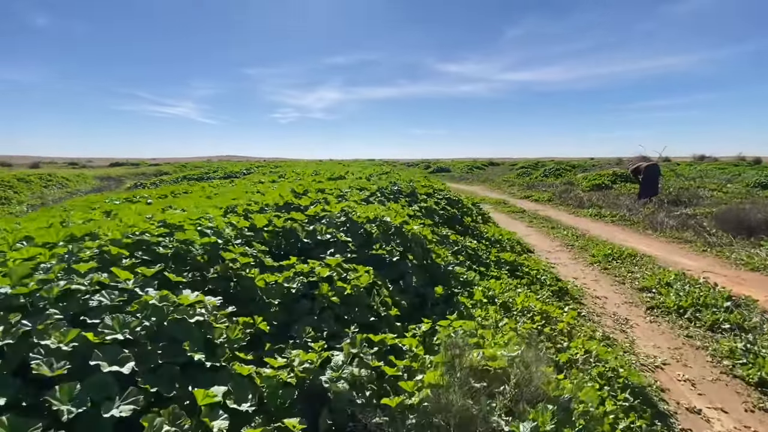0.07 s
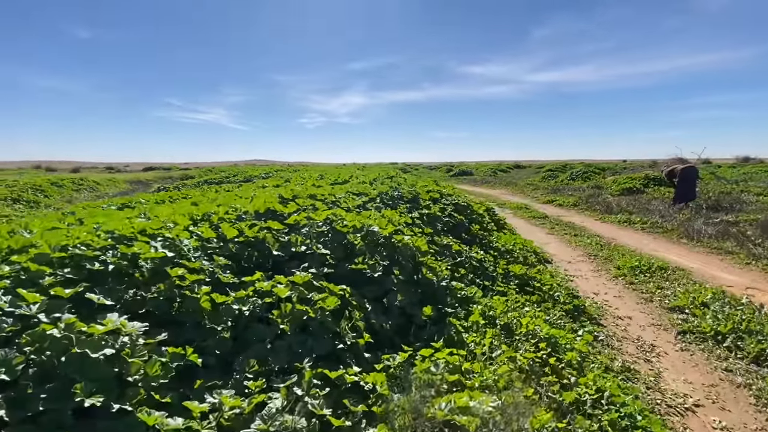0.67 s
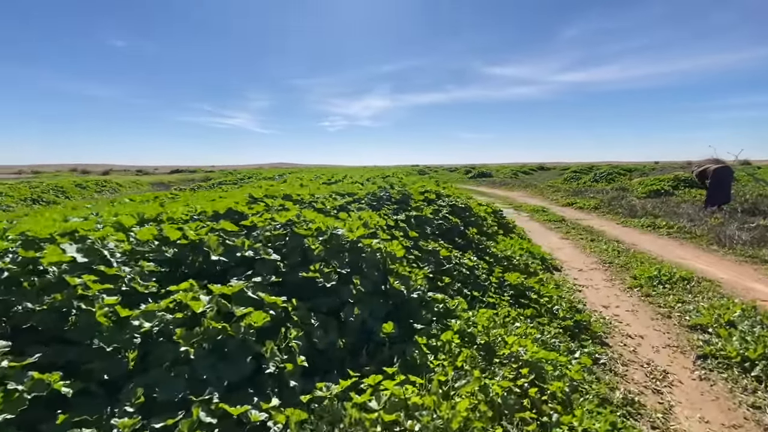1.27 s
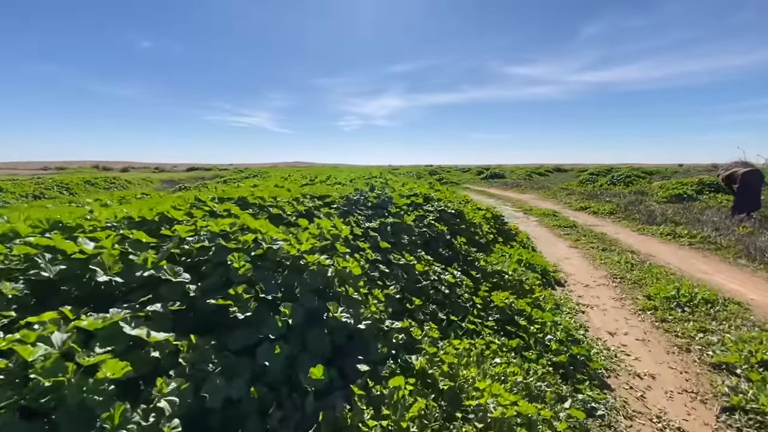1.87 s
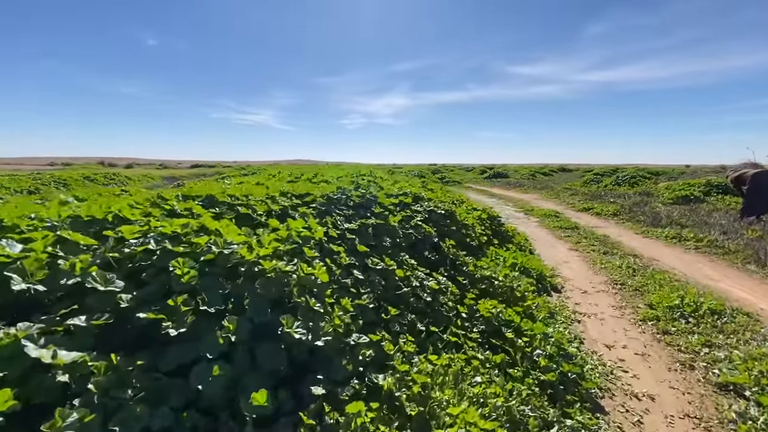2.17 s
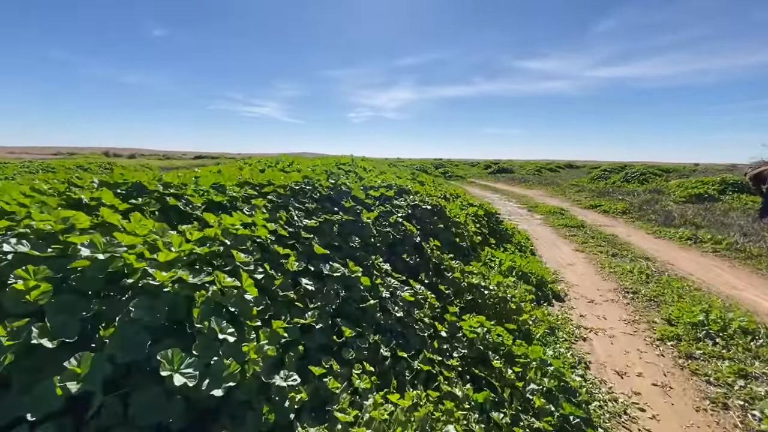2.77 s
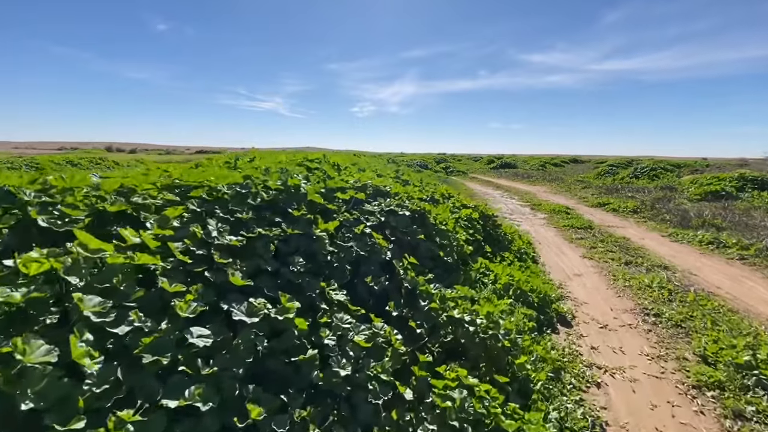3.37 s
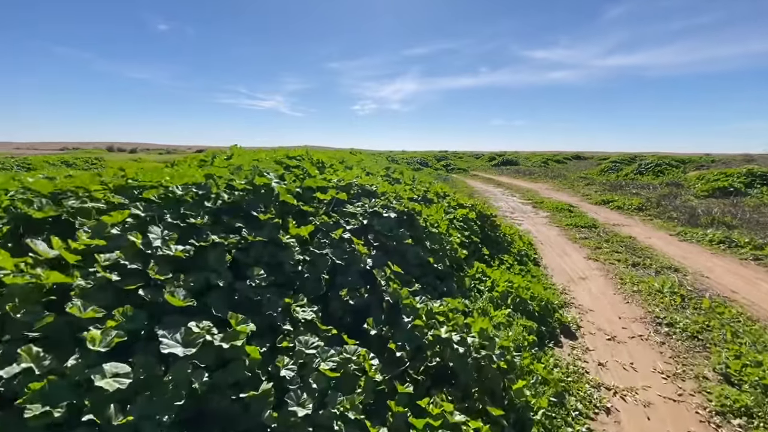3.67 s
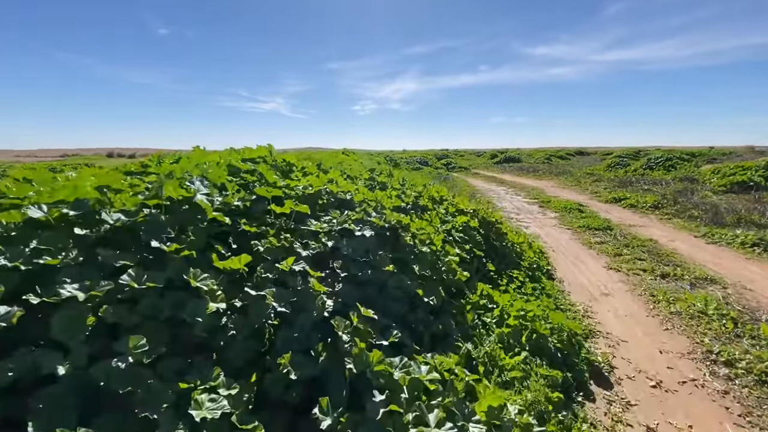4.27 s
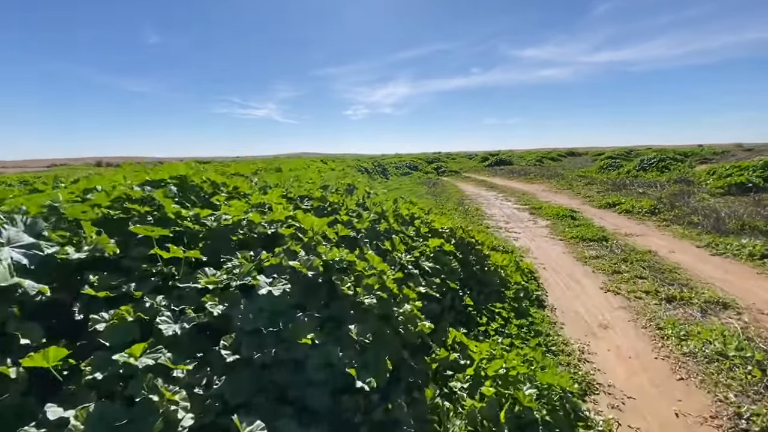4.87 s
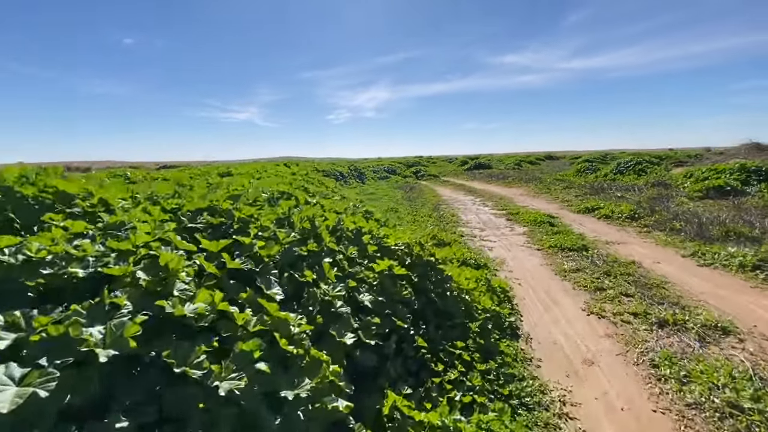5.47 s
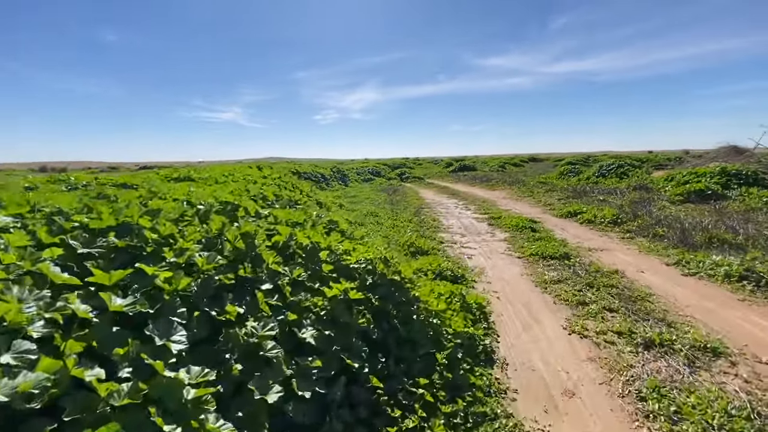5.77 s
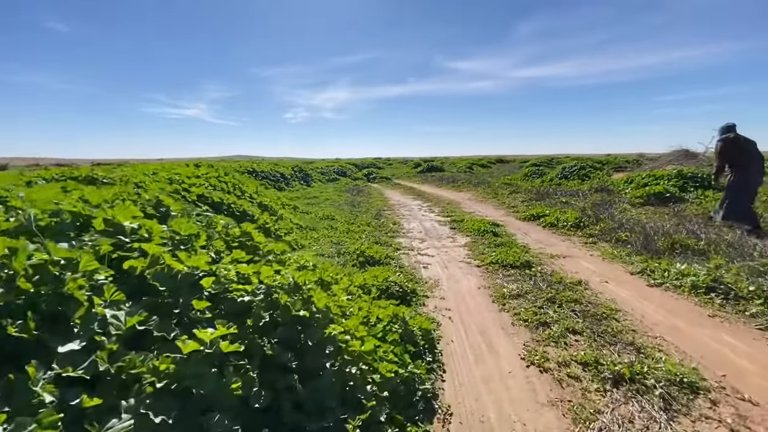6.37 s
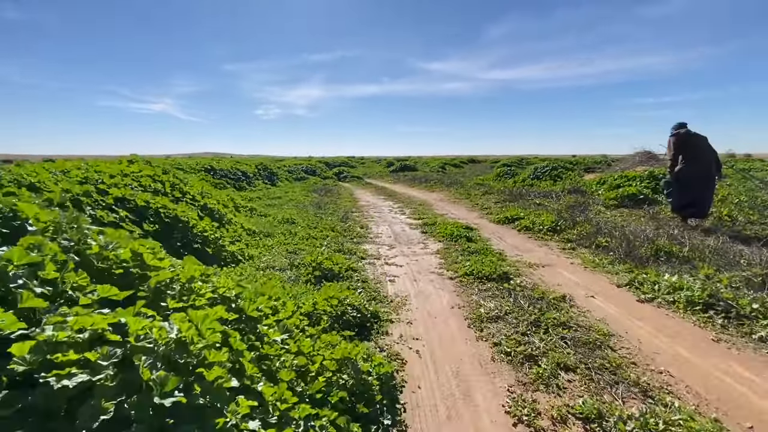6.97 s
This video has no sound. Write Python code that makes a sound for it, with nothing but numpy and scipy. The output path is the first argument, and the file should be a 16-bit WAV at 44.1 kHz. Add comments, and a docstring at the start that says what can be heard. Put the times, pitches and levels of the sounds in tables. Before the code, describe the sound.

Slow, soft footsteps grind sand and brush low leaves, while wind rumbles on the microphone and a small bird warbles faintly.

```python
"""Open country, the edge of a sandy track; slow, soft steps close under a hand-held microphone.
From the start soles grind sand and knock on clods, low leaves brush the legs, stalks snap and a small
bird warbles some way off to the left. At 1 s a broad leaf drags along a trouser leg and slips free;
the breeze then freshens and buffets the microphone until about 3 s. Near 5 s the bird sings again,
the shoes go on into dry, crackling straw, and at 7 s the breeze drops."""
import sys
import numpy as np
from scipy import signal
from scipy.io import wavfile
from scipy.ndimage import uniform_filter1d

SR = 44100
rng = np.random.default_rng(int(sys.argv[2]) if len(sys.argv) > 2 else 0)


def materialize(psi):
    """Save the field psi as 16-bit PCM at rate SR to the path in sys.argv[1].

    A 1-D psi becomes a single channel; in a 2-D psi each row is a channel.
    """
    bounded = np.clip(np.atleast_2d(psi).T, -1, 1)
    quanta = np.round(bounded * 32767).astype(np.int16)
    wavfile.write(sys.argv[1], SR, quanta)


N = 309141
TIME = np.arange(N) / SR

# Table levels are relative: each source adds its own gain on the way to the microphone.
# footfalls, about 0.65 s apart: (time of full weight [s], swell [s], fade [s], sand [dB], leaves [dB])
FOOTFALLS = [(0.099, 0.93, 1, -58, -53.5), (0.838, 0.033, 0.11, -56.5, -49.5),
             (1.485, 0.1, 0.36, -62.5, -64), (2.121, 0.17, 0.21, -56, -54),
             (2.779, 0.0082, 0.11, -50, -55.5), (3.42, 0.1, 0.21, -57, -61),
             (3.984, 0.086, 0.18, -51, -53.5), (4.781, 0.22, 0.15, -54.5, -52.5),
             (5.386, 0.068, 0.34, -58.5, -60), (6.024, 0.024, 0.2, -55, -53.5),
             (6.717, 0.028, 0.25, -57, -59.5)]
# the other foot pushes off and swings through the plants: (time [s], sand [dB], leaves [dB])
FOOT_SCUFFS = [(0.35, -83, -54), (0.56, -71, -56), (1.021, -49.5, -48.5), (1.19, -63, -65),
               (1.99, -64, -76), (2.462, -65.5, -59), (2.611, -59.5, -65), (2.805, -67, -71),
               (2.91, -63, -64), (3.275, -63, -68), (3.58, -66, -71), (3.888, -59, -74), (4.579, -59, -66),
               (4.715, -53.5, -75), (5.92, -62, -59.5), (6.18, -85, -57.5), (6.39, -71, -53.5),
               (6.579, -57.5, -60.5)]
# the swinging foot is clear of sand and plants: (time [s])
FOOT_CLEAR = [0.68, 1.28, 1.889, 2.74, 3.15, 3.78, 4.36, 4.449, 5.2, 5.84, 6.32, 6.652]
# the shoe meets clods and pebbles: (time [s], level [dB], pitch [Hz])
CLOD_KNOCKS = [(0.873, -35, 690), (1.0, -46, 1410), (1.0191, -38.5, 1270), (2.191, -39, 970),
               (2.309, -46, 1090), (2.9636, -40.5, 1150), (3.2379, -49, 910), (3.243, -44.5, 750),
               (3.276, -40.5, 850), (3.598, -47, 1490), (3.746, -52.5, 1120), (4.253, -51.5, 1190),
               (4.532, -51, 925), (4.574, -46.5, 1300), (4.63, -48.5, 915), (4.798, -41.5, 940),
               (4.906, -51, 1080), (5.298, -46, 1410), (5.579, -43, 840), (6.579, -46, 740),
               (6.912, -46, 660)]
# stalks break underfoot: (time [s], level [dB])
STALK_SNAPS = [(0.1132, -42), (0.2127, -49), (0.317, -51.5), (0.454, -47.5), (0.5252, -46), (0.738, -43.5),
               (0.761, -49.5), (2.1896, -41), (2.2342, -46), (2.308, -51.5), (2.4028, -50), (2.4562, -46),
               (2.467, -52), (3.6, -57), (4.024, -48.5), (4.538, -55), (4.9047, -54.5), (4.9797, -52),
               (5.363, -55), (5.756, -56), (6.346, -55), (6.3708, -47.5), (6.383, -42.5), (6.494, -56.5),
               (6.578, -54)]
# the shoe presses on dry straw: (time [s], level [dB])
STRAW_PRESSES = [(5.78, -70), (6.381, -66.5), (6.73, -79)]
# spectra of sliding sand and of dry stalks: (frequency [Hz], level [dB])
SAND_COLOUR = [(200, -20), (500, -5), (850, 1), (1600, 1.5), (2400, -4), (4000, -8.5), (6000, -31),
               (12000, -56)]
STRAW_COLOUR = [(800, -30), (3000, -45), (4400, -9), (5000, 7), (5350, -10), (5700, 5), (6100, -2),
                (6500, 4), (7800, -5.5), (8200, 2.5), (9700, 0.5), (11400, 3.5), (12800, -13), (15500, -17)]
# leaf spectrum at the microphone's two ports, a list each: (frequency [Hz]), (left [dB]), (right [dB])
LEAF_BANDS_HZ = [800, 2200, 3300, 4900, 5350, 5700, 6150, 6700, 7750, 8150, 9300, 10100, 11600, 13200]
LEAF_LEFT_DB = [-14.5, -2.5, -3, 0, -4.5, -2, -5.5, -1.5, -5, -8, -9, -35, -18.5, -37]
LEAF_RIGHT_DB = [-0.5, -6.5, -5.5, -11, -15, -16, -46, -8, -21.5, -2.5, 0, -5.5, -19, -36]
# the breeze at the microphone freshens, eases and drops: (time [s], rumble [dB], buffeting [dB])
BREEZE_LEVELS = [(0.0, -38, -63), (0.62, -44.5, -64), (1.55, -35.5, -48), (2.1, -40, -50.5),
                 (2.85, -39, -54), (3.35, -44.5, -66), (4.89, -44.5, -62), (5.76, -41, -59.5),
                 (6.75, -50, -67.5), (7.0, -67, -79.5)]
# gusts and lulls on top of it: (time [s], change of rumble [dB])
BREEZE_GUSTS = [(0.5, -4.5), (0.869, 7.5), (1.501, 5), (1.661, -8), (3.42, -6), (3.96, 4), (4.38, -18),
                (4.67, 4), (4.86, -5.5), (6.21, 0.5), (6.45, 4), (6.6, 7.5)]
# single eddies strike the microphone: (time [s], level [dB], pitch [Hz])
EDDY_THUMPS = [(0.565, -48, 237), (1.359, -34.5, 160), (1.456, -50, 463), (1.52, -37.5, 400),
               (1.95, -43, 185), (2.087, -44, 276), (2.153, -46.5, 420), (2.176, -46.5, 500),
               (2.188, -38.5, 345), (2.324, -41, 198), (2.332, -45, 477), (2.58, -44, 450),
               (2.69, -50.5, 450), (2.984, -49, 436), (4.66, -45, 210), (5.784, -43.5, 202),
               (6.31, -49, 230)]
# spectra of the wind on the microphone: (frequency [Hz], level [dB])
RUMBLE_COLOUR = [(30, -27), (48, -3.5), (66, 1), (100, -3), (160, -12), (260, -21.5), (500, -65.5),
                 (1200, -86.5)]
BUFFET_COLOUR = [(50, -15), (130, 0), (220, 2), (350, -5), (550, -16), (900, -31.5), (2500, -89.5)]
# the distant bird's slurs: (time [s], length [s], first pitch [Hz], last pitch [Hz], level [dB])
BIRD_SLURS = [(0.376, 0.094, 4330, 3420, -70), (0.628, 0.087, 3530, 3850, -76),
              (0.87, 0.091, 4350, 3540, -69.5), (1.097, 0.078, 3820, 3390, -69),
              (1.171, 0.16, 4350, 3260, -75.5), (5.038, 0.094, 4080, 3680, -75.5),
              (5.205, 0.12, 3830, 3460, -72), (5.436, 0.13, 3860, 3420, -71),
              (5.691, 0.1, 3140, 2910, -79.5), (6.651, 0.12, 4140, 3690, -69.5),
              (6.817, 0.11, 3850, 4630, -73), (6.925, 0.045, 3190, 3500, -68)]
# its trills: (time [s], length [s], first pitch [Hz], last pitch [Hz], warble rate [1/s], level [dB],
# warble depth [Hz])
BIRD_TRILLS = [(1.311, 0.13, 3810, 2780, 40, -64.5, 220), (1.429, 0.084, 2880, 4280, 67, -54, 445),
               (1.623, 0.095, 3340, 2810, 56, -67.5, 200), (1.712, 0.0833, 3260, 3590, 35, -56, 386),
               (1.884, 0.032, 4150, 4450, 61, -63, 440), (4.965, 0.074, 3400, 3900, 49, -67, 220)]
# spectrum of the open field's hush: (frequency [Hz], level [dB])
AIR_COLOUR = [(300, 6), (600, -4), (3400, -8), (6100, -17), (9200, -10), (13000, -85.5)]


def walk(scuff_swell_s=0.099, scuff_fade_s=0.12, crumble_db=-15, hush_db=-6):
    """Gains of sand and leaves underfoot: footfalls, scuffs and clods crumbling to grit add in power."""
    scuffs = [(s, scuff_swell_s, scuff_fade_s, *levels) for s, *levels in FOOT_SCUFFS]
    crumbles = [(s, 0.012, 0.052, db + crumble_db, -np.inf) for s, db, _ in CLOD_KNOCKS]
    power = gain_of([[-71], [-73.5]]) ** 2 * np.ones(N)  # trousers and plants never quite fall still
    for s, swell_s, fade_s, sand_db, leaves_db in FOOTFALLS + scuffs + crumbles:
        t = TIME[slice(*np.searchsorted(TIME, [s - 2 * swell_s, s + 2 * fade_s]))]
        add(power, t[0], (gain_of([[sand_db], [leaves_db]]) * swell(s, swell_s, fade_s, t)) ** 2)
    foot_clear = sum(bump(s, half_width_s=0.04) for s in FOOT_CLEAR)
    return np.sqrt(power) * gain_of(hush_db * foot_clear)


def sand(grinding):
    """Grains slip in a soft swish as weight rolls over the sole; crust pops and single grits crack."""
    slip = grains(per_s=600, spread_db=3.7, grain_s=.0007, smooth_share=.33)
    hiss = coloured(noise_pair(likeness=0.91) * slip, SAND_COLOUR)
    swish = evened(shifting(hiss, patch_hz=350, depth_db=2))
    crumbs = gain_of(-6.5) * pops(low_hz=1000, high_hz=2300, per_s=550, cycles=2.4, spread_db=7)
    cracks = gain_of(-14) * pops(low_hz=1700, high_hz=4500, per_s=35, cycles=1, spread_db=14)
    return (swish + crumbs + cracks) * grinding * gain_of(-4.0) * panned(left_db=-1.5)


def leaves(sweeping):
    """Soft leaves rustle over shoes and trousers, and their edges flick past in small, pitched ticks."""
    brushing = grains(per_s=300, spread_db=4.5, grain_s=.0015, smooth_share=.45)
    friction = leafy(noise_pair(likeness=0.055) * brushing)
    rustle = evened(shifting(friction, patch_hz=350, depth_db=3.2))
    edges = [pops(low_hz=3000, high_hz=10000, per_s=110, cycles=9, spread_db=16) for port in range(2)]
    flicks = gain_of(-14.5) * evened(leafy(edges))
    return (rustle + flicks) * sweeping * gain_of(-2.5) * panned(left_db=2.5)


def knocks(ring_s=0.0013, ring_db=3.5, rebound_db=-12, tick_db=-12):
    """A shoe meets a clod with a tick and a dull knock; the clod rocks and touches once more."""
    out = np.zeros(N)
    rebounds = rng.uniform([.002, .7], [.006, 1.1], (len(CLOD_KNOCKS), 2))
    for (s, db, hz), (delay_s, detune) in zip(CLOD_KNOCKS, rebounds):
        start = s - 1.1 / hz
        add(out, start, gain_of(db + tick_db) * blip(2 * hz, cycles=0.62))
        # all knocks ring equally briefly, so the low ones are the dullest
        add(out, start, gain_of(db + ring_db) * blip(hz, cycles=hz * ring_s, softness=2))
        add(out, start + delay_s, gain_of(db + rebound_db) * blip(hz * detune, cycles=1.0))
    return out * panned(left_db=-6.5)


def snaps(crack_s=0.0015, splinter_s=0.011, splinter_db=-17, tick_hz=3100, tick_db=5, straw_from_s=5.55):
    """Stalks crack and their fibres splinter: green ones with a sharp tick, dry straw ringing brighter."""
    green, dried, ticks = np.zeros((3, N))
    t = np.arange(SR // 15) / SR
    burst = np.exp(-t / crack_s) + gain_of(splinter_db) * np.exp(-t / splinter_s)
    for (s, db), thinness in zip(STALK_SNAPS, rng.uniform(.85, 1.2, len(STALK_SNAPS))):
        if s < straw_from_s:
            add(green, s, gain_of(db) * burst)
            add(ticks, s, gain_of(db + tick_db) * blip(tick_hz * thinness, cycles=1, softness=2))
        else:
            add(dried, s, gain_of(db) * burst)
    moist = gain_of(1) * leafy(green * noise_pair(likeness=0.42))
    brittle = gain_of(5.0) * coloured(dried * noise_pair(likeness=0.43), STRAW_COLOUR)
    return moist + brittle + ticks


def leaf_drag(at_s=1.075, swell_s=0.13, fade_s=0.075, free_s=1.15, release_s=0.0064):
    """A broad leaf rustles along a trouser leg, sticking and slipping in tiny squeaks until it is free."""
    slips = grains(per_s=250, spread_db=3, grain_s=.002, smooth_share=.5)
    squeaks = pops(low_hz=6100, high_hz=7700, per_s=400, cycles=18, spread_db=10)
    scrape = gain_of(-61.5) * pops(low_hz=5000, high_hz=11800, per_s=700, cycles=7, spread_db=8)
    rustle = gain_of(-54.5) * evened(leafy(noise_pair(likeness=0) * slips))
    squeaking = squeaks * swell(at_s, swell_s, fade_s) * gain_of([[-47.5], [-64.5]])  # well to the left
    rubbing = (rustle + scrape) * swell(at_s, swell_s, fade_s=np.inf) * panned(left_db=1.5)
    touching = .5 - .5 * np.tanh((TIME - free_s) / release_s)
    return (squeaking + rubbing) * touching


def straw(settle_db=-5):
    """Dry straw crackles in small, bright ticks under each press, and faintly as it bends and settles."""
    crackle = grains(per_s=220, spread_db=4, grain_s=.0008, smooth_share=.45)
    pressed = np.zeros(N)
    for s, db in STRAW_PRESSES:
        press = swell(s, swell_s=0.14, fade_s=0.19)
        settle = gain_of(settle_db) * swell(s, swell_s=0.26, fade_s=0.49)
        pressed += gain_of(db) * np.maximum(press, settle)
    return evened(coloured(noise_pair(likeness=0.19) * crackle, STRAW_COLOUR)) * pressed * gain_of(6.0)


def wind(knee_hz=380, brightening=0.55, buffet_db_per_db=1.75):
    """Eddies push on one microphone port as they pull on the other; gusts break into short buffets."""
    gust_db = sum(db * bump(s, half_width_s=0.039) for s, db in BREEZE_GUSTS)
    times, rumble_db, buffet_db = np.transpose(BREEZE_LEVELS)
    flow = gain_of(np.interp(TIME, times, rumble_db) + gust_db)
    force = gain_of(np.interp(TIME, times, buffet_db) + buffet_db_per_db * gust_db)
    turbulence = flutter(per_s=24, depth_db=3.1)
    rumble = evened(coloured(noise_pair(likeness=-0.35), RUMBLE_COLOUR) * turbulence) * flow * gain_of(-2)
    eddies = noise_pair(likeness=-0.38)
    eddies *= grains(per_s=115, spread_db=3.9, grain_s=0.0034, smooth_share=0.04)
    lulls = flutter(per_s=30, depth_db=2.6)
    buffets = evened(coloured(eddies, BUFFET_COLOUR) * turbulence * lulls) * force * gain_of(1.0)
    # a stronger gust sheds smaller eddies, so it sounds brighter
    large = signal.filtfilt(*signal.butter(2, knee_hz, fs=SR), buffets)
    small = (buffets - large) * evened(force) ** brightening
    thumps = np.zeros(N)
    for s, db, hz in EDDY_THUMPS:
        add(thumps, s, gain_of(db + 12.0) * blip(hz, cycles=0.87))
    buffeting = large + small + np.array([thumps, -thumps])
    return rumble * panned(left_db=2.5) + buffeting * panned(left_db=8.0)


def bird(slur_warbles_per_s=31, slur_depth_hz=150, clear_depth_hz=367):
    """A small bird whistles some way off; moving air makes it flicker and plants scatter a faint tail."""
    song = np.zeros(N)
    unsteady = flutter(per_s=60, depth_db=.6)
    rasp = signal.lfilter(*signal.butter(2, 170, fs=SR), [1, 1j] @ rng.standard_normal((2, N)))
    rasp /= np.sqrt(np.mean(np.abs(rasp) ** 2))

    def sing(s, length, first_hz, last_hz, warbles_per_s, db, depth_hz, trill):
        """A slur glides early and warbles late; a trill glides evenly, warbles throughout and swells."""
        samples = np.arange(round(length * SR))
        progress, now = samples / SR / length, round(s * SR) + samples
        if trill:
            glide = progress
            hoarse = max(1 - (depth_hz / clear_depth_hz) ** 2, 0)  # shallow trills are hoarse
            db = db + 5 * depth_hz / clear_depth_hz * (progress - 2)  # deep ones swell the most
        else:
            glide = np.polyval(np.polyfit([0, .5, 1], [0, .74, 1], 2), progress)
            hoarse = .2
            depth_hz = depth_hz * progress
        warble = np.sin(2 * np.pi * np.cumsum(warbles_per_s * unsteady[now]) / SR)
        hz = first_hz + (last_hz - first_hz) * glide + depth_hz * warble
        roughness = np.sqrt(1 - hoarse) + np.sqrt(hoarse) * rasp[now]
        tone = (roughness * np.exp(2j * np.pi * np.cumsum(hz) / SR)).real
        add(song, s, gain_of(db) * signal.windows.tukey(len(samples), .2) * tone)

    for *note, db in BIRD_SLURS:
        sing(*note, slur_warbles_per_s, db, slur_depth_hz, trill=False)
    for note in BIRD_TRILLS:
        sing(*note, trill=True)
    song *= flutter(per_s=160, depth_db=2)
    return gain_of(3.0) * (song + gain_of(-7) * plant_scatter(song)) * panned(left_db=8.0)


def plant_scatter(sound, decay_s=0.019):
    """Plants scatter a distant sound into a short tail, different at each port."""
    t = np.arange(SR // 4) / SR
    tail = rng.standard_normal((2, len(t))) * np.exp(-t / decay_s)
    return signal.oaconvolve(np.array([sound, sound]), tail / np.linalg.norm(tail[0]), axes=1)[:, :N]


def air():
    """The faint, even hush of the open field all around."""
    return gain_of(-75.0) * evened(coloured(noise_pair(likeness=0.32), AIR_COLOUR))


def leafy(x):
    """Leaves sound from below and to the side, so each port colours them in its own way."""
    ports = zip(x, (LEAF_LEFT_DB, LEAF_RIGHT_DB))
    return np.vstack([coloured(sound, list(zip(LEAF_BANDS_HZ, db))) for sound, db in ports])


def shifting(x, patch_hz, depth_db):
    """The points of contact keep changing, so brief resonances come and go across the spectrum."""
    spectra = signal.stft(x, nperseg=512, noverlap=384)[2]
    bins = max(round(patch_hz * 512 / SR), 1)
    patches = uniform_filter1d(rng.standard_normal(spectra.shape[1:]), bins, axis=0)
    patches = evened(uniform_filter1d(patches, size=6, axis=1))
    spectra *= gain_of(depth_db * np.clip(patches, -2, 2))
    return signal.istft(spectra, nperseg=512, noverlap=384)[1][:, :N]


def grains(per_s, spread_db, grain_s, smooth_share):
    """Envelope of many tiny bursts of uneven size over a smooth bed."""
    sizes = gain_of(spread_db * np.minimum(rng.exponential(1, N), 3.5))
    onsets = rng.random(N) < per_s / SR
    power = signal.lfilter([1], [1, -np.exp(-1 / (grain_s * SR))], sizes ** 2 * onsets)
    return np.sqrt(smooth_share + (1 - smooth_share) * power / power.mean())


def pops(low_hz, high_hz, per_s, cycles, spread_db):
    """A shower of tiny pops of uneven size, each with its own pitch."""
    out = np.zeros(N)
    for when, pitch, size in rng.random((round(per_s * N / SR), 3)):
        hz = low_hz * (high_hz / low_hz) ** pitch
        add(out, when * N / SR, gain_of(spread_db * size ** 2) * blip(hz, cycles))
    return evened(out)


def blip(hz, cycles, softness=1):
    """A pitched pulse that peaks after cycles / 2 periods and dies away; softness rounds its start."""
    turns = np.arange(0, 6 * cycles, hz / SR)
    age = 2 * turns / cycles
    return (age * np.exp(1 - age)) ** softness * np.sin(2 * np.pi * turns)


def swell(s, swell_s, fade_s, t=TIME, swing_db=20):
    """A gain that climbs swing_db per swell_s to 1 at time s, then falls swing_db per fade_s."""
    away = np.maximum((s - t) / swell_s, (t - s) / fade_s)
    return gain_of(-swing_db * np.minimum(away, 10))


def bump(s, half_width_s):
    """A smooth hump of height 1 around time s."""
    return np.exp(-np.minimum(((TIME - s) / half_width_s) ** 2, 20))


def flutter(per_s, depth_db):
    """A gain that wanders at random."""
    times = np.cumsum(rng.uniform(.5, 1.5, 4000)) / per_s
    wander = np.clip(rng.standard_normal(len(times)), -2, 2)
    return gain_of(depth_db * np.interp(TIME, times, wander))


def noise_pair(likeness):
    """White noise at the two ports, with likeness as its correlation."""
    left, other = rng.standard_normal((2, N))
    return np.array([left, likeness * left + np.sqrt(1 - likeness ** 2) * other])


def coloured(x, colour, size=4096):
    """Passes x through a causal filter of unit energy with the given spectrum."""
    hz, db = np.transpose(colour)
    bin_hz = np.abs(np.fft.fftfreq(size, 1 / SR))
    log_gain = np.log(gain_of(np.interp(np.log(bin_hz + 1), np.log(hz), db)))
    taps = np.fft.ifft(np.exp(np.conj(signal.hilbert(log_gain)))).real[:size // 2]  # minimum phase
    return signal.oaconvolve(np.atleast_2d(x), taps[None] / np.linalg.norm(taps), axes=1)[:, :N]


def gain_of(db):
    """Decibels to amplitude."""
    return 10 ** (np.asarray(db) / 20)


def evened(x):
    """Scales to an rms of 1."""
    return x / np.sqrt(np.mean(x ** 2) + 1e-20)


def panned(left_db):
    """Gains of the two channels for a left-minus-right level."""
    return gain_of([[left_db / 2], [-left_db / 2]])


def add(mix, s, sound):
    """Adds a sound to the mix at time s."""
    part = mix[..., max(round(s * SR), 0):][..., :sound.shape[-1]]
    part += sound[..., :part.shape[-1]]


def scene():
    """Breeze on the microphone, steps just below it, the bird farther off; no walls to echo."""
    grinding, sweeping = walk()
    breeze = wind()
    steps = sand(grinding) + leaves(sweeping) + leaf_drag() + straw() + knocks() + snaps()
    return breeze + steps + bird() + air()


def record(dry, edge_hz=15750):
    """The highest treble is cut off above about 15.75 kHz."""
    lowpass = signal.firwin(511, edge_hz, window=("kaiser", 9), fs=SR)
    return signal.oaconvolve(dry, lowpass[None], "same")


dry = scene()
out = record(dry)
materialize(out)
```